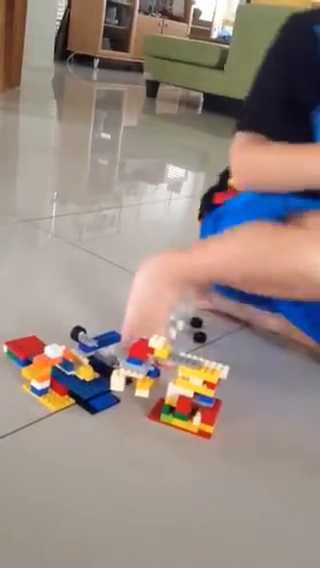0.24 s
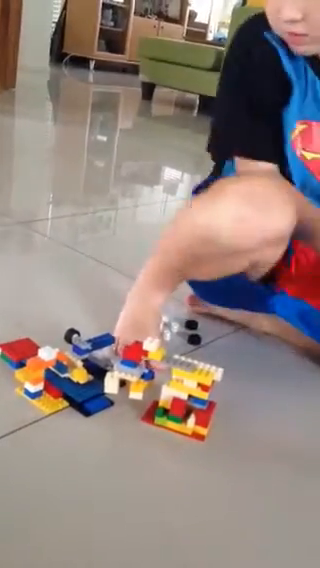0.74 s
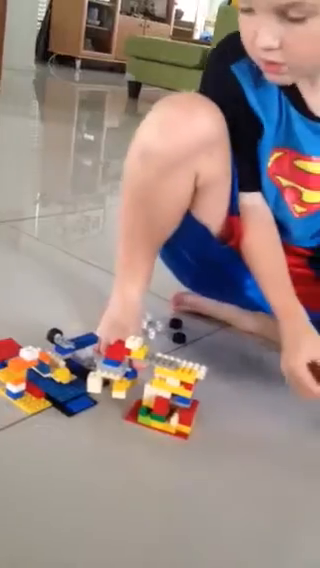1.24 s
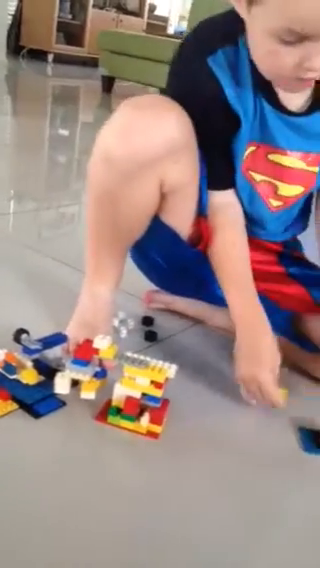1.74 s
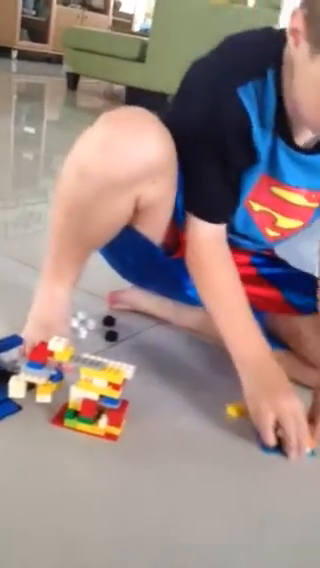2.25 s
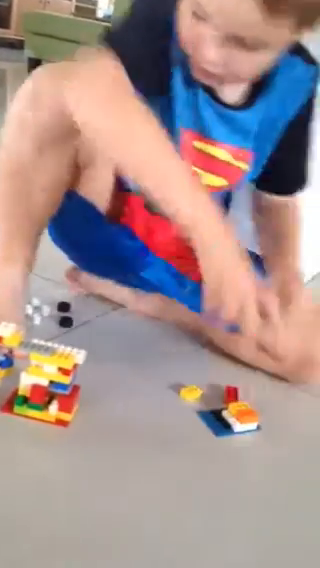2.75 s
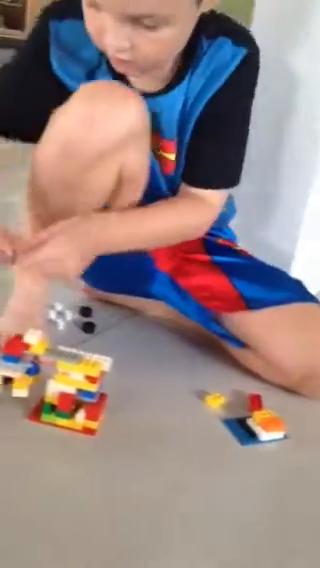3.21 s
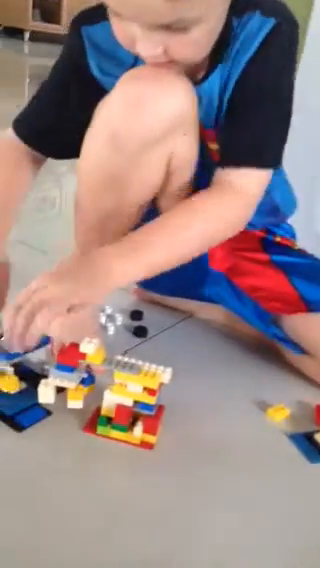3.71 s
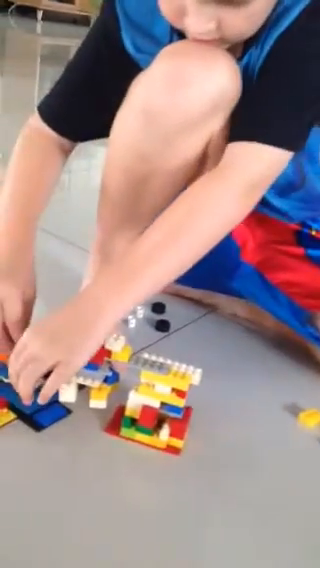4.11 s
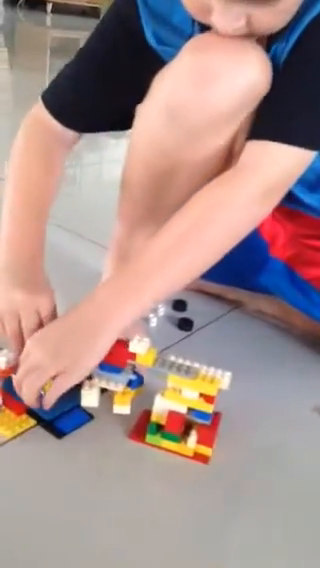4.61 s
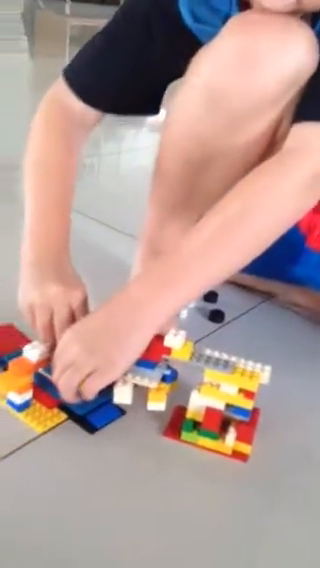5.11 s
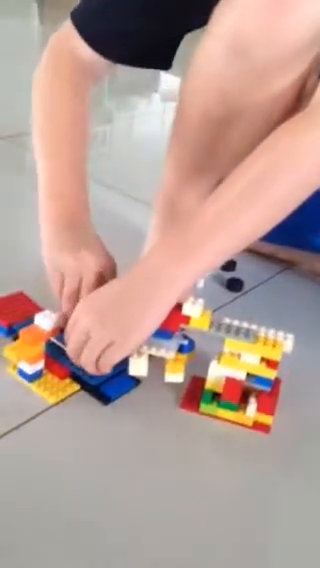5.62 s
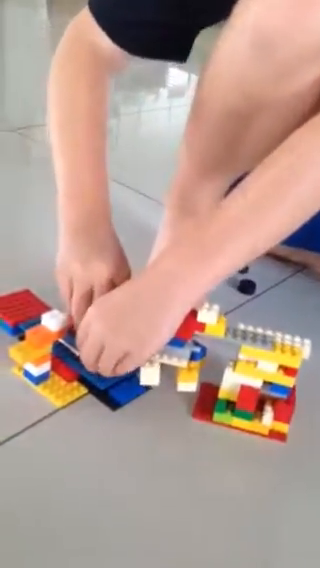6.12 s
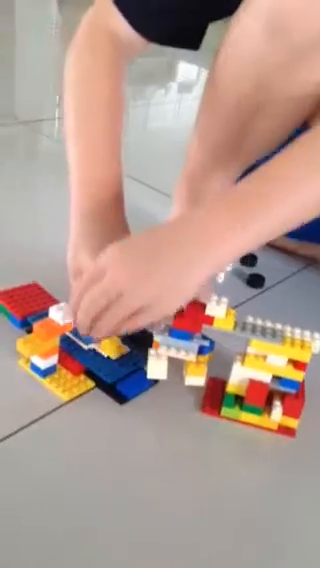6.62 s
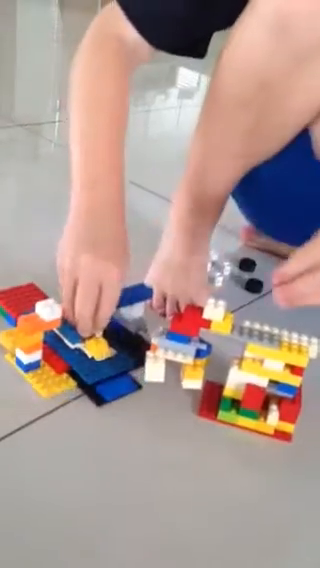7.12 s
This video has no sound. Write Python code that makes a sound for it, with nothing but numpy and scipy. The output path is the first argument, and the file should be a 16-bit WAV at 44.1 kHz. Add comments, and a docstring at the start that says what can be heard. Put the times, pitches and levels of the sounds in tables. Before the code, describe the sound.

Hollow plastic building bricks are handled on a tiled floor in a quiet room. Light, irregular clicks come through the first second, building to a sharp, loud snap at about 1.2 seconds, with a smaller click after it. At about 1.9 seconds a loose brick drops and bounces with a quick, bright clatter, followed immediately by a smaller piece that rings slightly and wobbles to rest by 2.2 seconds. Soft ticks continue until about 2.8 seconds, then the handling pauses. Faint clicks return from 4.5 seconds, with a clearer one at 5.2, a duller, hollow click at 5.6 and tiny ticks afterwards. Around 7.2 seconds a last press gives a short, gritty crunch of several snaps. Hard walls add a brief echo to every click, and a faint room hum and microphone hiss lie underneath throughout.

```python
"""On the tiled floor of a quiet, bare room, hollow plastic building bricks are handled.
They click as they are pressed and prised, each snap exciting damped resonances of walls and cavities.
Two loose pieces drop and bounce, ringing in their modes; a last press ends in a stick-slip crunch.
Hard walls reflect every click; below lie the room's hum and the microphone's hiss."""
import sys
import numpy as np
from scipy import signal
from scipy.fft import rfft, irfft
from scipy.io import wavfile

SR = 44100
rng = np.random.default_rng(int(sys.argv[2]) if len(sys.argv) > 2 else 0)


def wav_record(signal):
    """Record a signal, one row per channel, as 16-bit PCM in the file named by sys.argv[1]."""
    frames = np.transpose(np.atleast_2d(signal))
    bounded = np.clip(frames, -1, 1)
    # unit amplitude maps onto the largest positive 16-bit level
    quanta = np.round(bounded * 32767).astype(np.int16)
    wavfile.write(sys.argv[1], SR, quanta)


N = 324135
LEAD = 256   # samples of a contact that precede its snap


def amp(db):
    """Amplitude ratio of a level in dB."""
    return 10 ** (np.asarray(db) / 20)


def at_hz(points, hz):
    """Interpolation of (Hz, value) points on a logarithmic frequency axis."""
    frequencies, values = np.transpose(points)
    return np.interp(np.log(hz), np.log(frequencies), values)


def unit_peak(x):
    """Normalisation to a peak of 1."""
    return x / np.max(np.abs(x))


def ring(force, hz, t60):
    """Damped oscillator: an impulse starts a sine that falls 60 dB in t60 seconds."""
    r, w = amp(-60 / (t60 * SR)), 2 * np.pi * hz / SR
    return signal.lfilter([0, np.sin(w)], [1, -2 * r * np.cos(w), r * r], force)


def soft_ring(force, hz, t60):
    """Resonators in cascade: a broad second one at the same pitch rounds the attack."""
    return ring(ring(force, hz, t60), hz, 3 / hz) * hz / SR


def add(out, start_s, sound, build_up_s=0.00049):
    """Superposition of a contact sound, its snap falling just after its audible start."""
    i = round((start_s + build_up_s) * SR) - LEAD
    out[i:i + len(sound)] += sound[:N - i]


def hum_and_hiss():
    """Filtered noise: a broad spectrum is heard as steady hiss, narrow bands as wavering hum."""
    # Each row: frequency in Hz, relative spectral density in dB.
    spectrum = [(15, -63), (25, -6), (44, -13.5), (97, -2), (130, -16), (153, -6), (242, -2.5), (416, -3.5),
                (516, -2.5), (560, -6.5), (1100, -9.5), (1230, -12), (3250, -11), (14400, -13.5),
                (16000, -14.5)]
    # Each row: centre in Hz, bandwidth in Hz, RMS level in dB.
    hum_bands = [(61, 10, -84), (89.8, 8.3, -88), (121.8, 8, -88), (445.4, 10, -96.5)]
    hz = np.maximum(np.arange(N // 2 + 1) * SR / N, 1)
    hiss = irfft(rfft(rng.standard_normal(N)) * amp(at_hz(spectrum, hz)), N)
    out = amp(-67.5) * hiss / np.std(hiss)
    for hum_hz, width, db in hum_bands:
        band = irfft(rfft(rng.standard_normal(N)) / (1 + (2 * (hz - hum_hz) / width) ** 2), N)
        out += amp(db) * band / np.std(band)
    return out


def contact(decay_s, cutoff_hz=1150, swell_db=-6, swell_s=0.0011):
    """Contact force: a brief swell of noise softens the attack, then the contact snaps and grates."""
    t = (np.arange(2300) - LEAD) / SR
    swell = amp(swell_db) * np.exp(np.minimum(t, 0) / swell_s)
    grating = np.exp(-np.abs(t) / decay_s)
    force = 0.2 * rng.standard_normal(len(t)) * np.where(t < 0, swell, grating)
    force[LEAD] = 1
    # A small body radiates little bass.
    return signal.sosfilt(signal.butter(5, cutoff_hz, "high", fs=SR, output="sos"), force)


def hollow(force, hz, cycles):
    """A brick's wall or cavity resonates briefly over a higher, inharmonic clack."""
    t60 = np.clip(cycles, 3, 50) / hz
    return unit_peak(soft_ring(force, hz, t60) + 0.13 * ring(force, 1.472 * hz, 7.2 / hz))


def clicks(stack_hz=1400, thud_hz=765, crack_hz=(4930, 11600)):
    """Impulsive excitation: each snap rings, cracks and thuds. Returns direct sound and room feed."""
    # Each row: start in seconds, low ring in Hz, its level in dB, high ring in Hz, its level in dB,
    # crack peak in dB, thud peak in dB, contact decay in seconds, ring length in cycles,
    # gain past the hands to the walls in dB.
    snaps = [(0.127, 2470, -34, 3950, -30.5, -37.5, -51, 0.0019, 11, 2),
             (0.312, 2120, -53, 5300, -39, -44, -59, 0.0014, 13, 2),
             (0.703, 2650, -46, 5310, -44.5, -55, -70, 0.0056, 49, -0.5),
             (0.751, 2620, -50, 4400, -48, -58, -75, 0.0011, 53, -11),
             (0.769, 2250, -46, 4110, -44, -39, -62, 0.0014, 75, 5.5),
             (1.016, 3040, -33, 5000, -27, -26, -63, 0.002, 15, -0.5),
             (1.149, 2200, -42.5, 5340, -36.5, -43, -66, 0.0025, 9.8, 3.5),
             (1.17, 2510, -51, 5820, -49, -44, -65, 0.0013, 18, 2),
             (1.1817, 2460, -16.5, 4250, -6, -9.5, -43, 0.00085, 12, -1.4),
             (1.188, 2436, -21, 3683, -26.5, -15.5, -35.5, 0.00089, 13, -3.5),
             (1.222, 2270, -40, 3920, -20.5, -27, -46, 0.0019, 18, -1.5),
             (1.555, 2710, -49, 3850, -37, -31.5, -75, 0.0013, 27, -2.5),
             (2.196, 1560, -48, 4570, -69, -38, -71, 0.00099, 11, 5),
             (2.233, 1444, -45.5, 5860, -59, -63, -63, 0.0012, 38, -10.5),
             (2.258, 1450, -61, 6040, -47, -64, -78, 0.0012, 25, 5),
             (2.367, 1420, -56.5, 5350, -50, -53, -80, 0.0018, 13, 3),
             (2.441, 1350, -57.5, 4360, -59, -55, -66, 0.0014, 33, -7),
             (2.514, 1560, -65, 4440, -59, -64, -75, 0.00096, 29, 7),
             (2.571, 1353, -43, 4250, -33, -43, -60, 0.0016, 38, -4),
             (2.577, 2440, -51, 3880, -60, -50, -66, 0.002, 18, 0.1),
             (2.632, 1640, -51.5, 3980, -64, -60, -64, 0.0012, 16, 8),
             (2.644, 1520, -41, 4960, -42, -54, -48.5, 0.0054, 12.5, -0.5),
             (2.831, 1440, -65.5, 3210, -62, -58, -57, 0.0012, 16, 2.5),
             (4.515, 2330, -57, 4780, -63, -64, -61, 0.0012, 12, 5.5),
             (4.691, 1740, -60.5, 4280, -62, -68, -64, 0.0011, 32, 5.3),
             (4.724, 1690, -57, 3200, -51.5, -53.5, -62, 0.0016, 20, -4),
             (5.034, 2430, -63, 6000, -59.5, -69, -62, 0.0012, 18, 4),
             (5.189, 2130, -57, 2910, -56, -69, -62, 0.0014, 25, 5.5),
             (5.211, 2590, -41, 4460, -37.5, -37, -57, 0.0034, 24, -7.5),
             (5.288, 2470, -60, 5060, -72, -75, -54.5, 0.0013, 18, 0.1),
             (5.619, 1593, -24, 2520, -39.5, -50, -44, 0.0026, 9.2, -5),
             (6.022, 1260, -53, 3500, -51, -55.5, -57.5, 0.0055, 7, -0.5),
             (6.845, 2590, -65.5, 5300, -67, -62, -55, 0.0012, 20, -4),
             (7.169, 1350, -35, 4450, -29, -40, -61, 0.0012, 19, 5.5),
             (7.184, 1750, -35, 3560, -31, -47, -63, 0.0015, 15, 1),
             (7.202, 1400, -29, 4430, -19.5, -40, -60, 0.0019, 18, -12),
             (7.214, 1930, -30, 4040, -53, -36, -49, 0.0012, 18, 0.5)]
    direct, to_walls = np.zeros((2, N))
    crack_band = signal.butter(2, crack_hz, "band", fs=SR, output="sos")
    push_release = np.diff(np.hanning(40), prepend=np.zeros(LEAD + 1), append=np.zeros(2004))
    thud = unit_peak(ring(push_release, thud_hz, 7.1 / thud_hz))
    for s, low_hz, low_db, high_hz, high_db, crack_db, thud_db, decay_s, cycles, walls_db in snaps:
        force = contact(decay_s)
        crack_force = contact(0.000765 + 0.37 * decay_s)
        crack = amp(crack_db) * unit_peak(signal.sosfilt(crack_band, crack_force))
        stack_clack = amp(-13) * unit_peak(soft_ring(force, stack_hz, 5 / stack_hz))
        low = amp(low_db) * (hollow(force, low_hz, cycles) - stack_clack)
        high = amp(high_db) * hollow(force, high_hz, cycles)
        body = low - high + amp(thud_db) * thud
        add(direct, s, body + crack)
        # The crack is more directional and reaches the walls less.
        add(to_walls, s, amp(walls_db) * (body + amp(-5) * crack))
    return direct, to_walls


def room(sound):
    """Reverberation: early reflections, then a diffuse field that decays band by band."""
    # Each row: delay from a near hard surface in seconds, level in dB.
    echoes = [(.0055, -16), (0.013, -16)]
    # Each row: frequency in Hz, reverberation time in seconds.
    decay_times = [(300, 1), (1000, 0.45), (3000, 0.52), (8000, 0.41), (14000, .3)]
    # Each row: frequency in Hz, gain of the diffuse field in dB.
    tail_gains = [(300, -38), (1000, -35.5), (3000, -37.5), (8000, -36), (14000, -39)]
    t = np.arange(SR) / SR
    response = np.zeros(SR)
    edges_hz = 180 * 2 ** np.arange(0, 7, .5)
    white = rng.standard_normal((2, SR))
    for k, (low, high) in enumerate(zip(edges_hz, edges_hz[1:])):
        hz = np.sqrt(low * high)
        band = signal.sosfilt(signal.butter(2, [low, high], "band", fs=SR, output="sos"), white[k % 2])
        response += amp(at_hz(tail_gains, hz) - 60 * t / at_hz(decay_times, hz)) * band
    response *= 1 - np.exp(-t / 0.00043)   # the tail builds up as echoes multiply
    for delay, db in echoes:   # furniture smears each reflection
        smear = np.convolve(rng.standard_normal(39), [.5, .5]) * np.exp(-np.arange(40) / 10)
        response[round(delay * SR):][:40] += amp(db) * smear / np.linalg.norm(smear)
    return signal.fftconvolve(sound, response)[:N]


def bounces(landings, modes, lowest_db, rise_db_per_s, contact_s, cutoff_hz, upper_hz):
    """Modal excitation: hard corners favour the upper modes; later, flatter landings wake the lowest."""
    out = np.zeros(N)
    highpass = signal.butter(4, upper_hz, "high", fs=SR, output="sos")
    for s, db, tilt_db in landings:
        force = contact(contact_s, cutoff_hz, swell_db=-60)
        scatter_db = rng.normal(0, 2, len(modes))
        lowest, *upper = [amp(mode_db + tilt_db * np.log2(hz / 5500) + scatter) * soft_ring(force, hz, t60)
                          for (hz, mode_db, t60), scatter in zip(modes, scatter_db)]
        clatter = unit_peak(signal.sosfilt(highpass, sum(upper)))
        settling_db = min(lowest_db + rise_db_per_s * (s - landings[0][0]), -22.5)
        add(out, s, amp(db) * (clatter + amp(settling_db) * unit_peak(lowest)))
    return out


def dropped_brick():
    """A brick lands corner after corner, each impact exciting its heavily damped modes."""
    # Each row: start in seconds, peak level in dB, spectral tilt in dB per octave.
    landings = [(1.9104, -21, 12), (1.9257, -20.5, -20.5), (1.931, -26, 9), (1.965, -24, 25),
                (1.9756, -31, -1), (1.9796, -25, -24), (1.9939, -25, 1), (2.0204, -30.5, 7)]
    # Each row: mode frequency in Hz, relative gain in dB, 60 dB decay time in seconds.
    modes = [(1700, 0, 0.00085), (3520, -27, 0.017), (4000, 10, 0.01), (4350, 31.5, 0.0048),
             (4870, 20.5, 0.0077), (5930, -34.5, 0.0035), (7510, 20.5, 0.0017), (8770, 20, 0.0025),
             (9340, 9, 0.0032), (10320, 11, 0.013), (12230, -10.5, .004), (14500, -34.5, 0.0034)]
    return bounces(landings, modes, lowest_db=-36, rise_db_per_s=150,
                   contact_s=0.0029, cutoff_hz=1400, upper_hz=3000)


def dropped_piece():
    """A small piece bounces and wobbles to rest; lighter damping lets it ring longer."""
    # Each row: start in seconds, peak level in dB, spectral tilt in dB per octave.
    landings = [(2.0358, -16, 14), (2.0486, -20, -5), (2.0654, -54, 20), (2.0924, -29, 29),
                (2.1151, -27, 4), (2.1265, -27, 27), (2.1354, -30, 22), (2.1635, -28, 20), (2.184, -42, 2),
                (2.2166, -45, 19)]
    # Each row: mode frequency in Hz, relative gain in dB, 60 dB decay time in seconds.
    modes = [(2283, 0, 0.053), (4290, 7, 0.042), (5840, 9, 0.0066), (6494, 16.5, 0.017),
             (7500, -24.5, 0.0029), (8270, 3.5, 0.0047), (8800, -33, 0.0072), (12400, -16, 0.0051),
             (15900, -38, 0.0034)]
    return bounces(landings, modes, lowest_db=-43, rise_db_per_s=500,
                   contact_s=0.00034, cutoff_hz=1800, upper_hz=3930)


def crunch(slips_per_s=3000):
    """Stick-slip friction: studs grate home at random and drive the modes of a pressed plate."""
    # Each row: time in seconds, grating level in dB.
    levels = [(7.163, -58), (7.167, -56.5), (7.205, -31.5), (7.226, -43)]
    # Each row: mode frequency in Hz, relative gain in dB, 60 dB decay time in seconds.
    modes = [(1350, -3, 0.015), (1830, -1, 0.014), (2530, 0, 0.0048), (3480, -0.5, 0.0088),
             (4420, -0.5, 0.013), (5470, -4, 0.0062), (6700, -7.5, 0.0033), (8800, -7, 0.0054)]
    slips = rng.standard_normal(N) * (rng.random(N) < slips_per_s / SR)
    grating = sum(amp(db) * ring(slips, hz, t60) * (-1) ** k for k, (hz, db, t60) in enumerate(modes))
    envelope = amp(np.interp(np.arange(N) / SR, *np.transpose(levels), left=-200, right=-200))
    return envelope * grating / np.std(grating)


def scene():
    """Superposition of direct sound, reverberation and background noise in one channel."""
    pressed, clicks_to_walls = clicks()
    brick, piece, plate = dropped_brick(), dropped_piece(), crunch()
    to_walls = clicks_to_walls + amp(-2.5) * brick + amp(3.0) * piece + amp(-11.0) * plate
    return (pressed + brick + piece + plate + room(to_walls) + hum_and_hiss())[None]


def record(dry):
    """Band limiting: a steep low-pass filter is 60 dB down at 16 kHz."""
    return signal.sosfilt(signal.cheby2(14, 60, 16000, fs=SR, output="sos"), dry)


dry = scene()
out = record(dry)
wav_record(out)
```